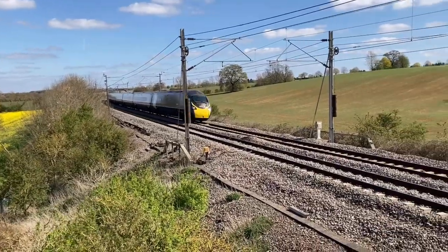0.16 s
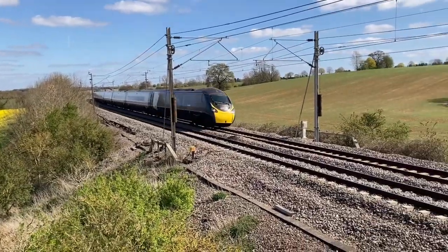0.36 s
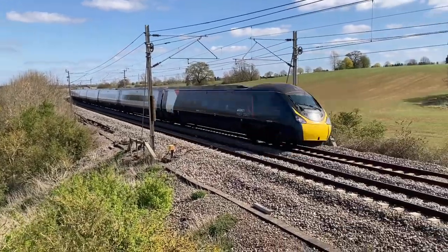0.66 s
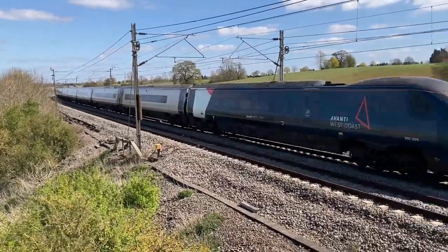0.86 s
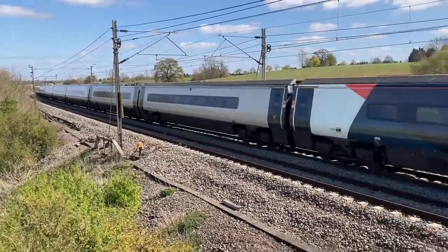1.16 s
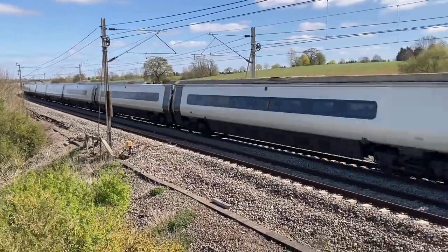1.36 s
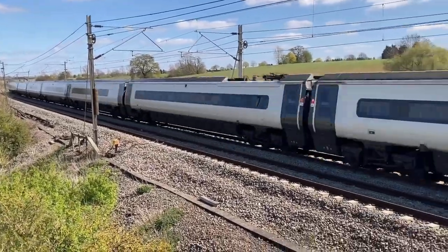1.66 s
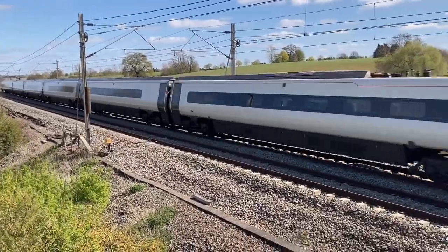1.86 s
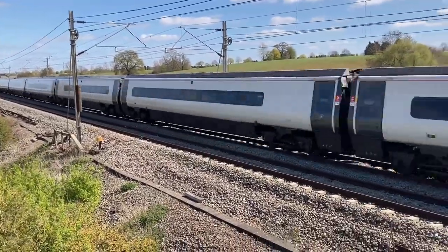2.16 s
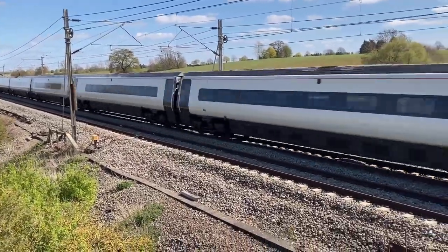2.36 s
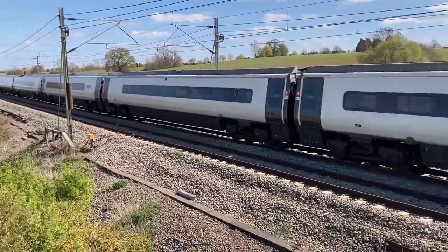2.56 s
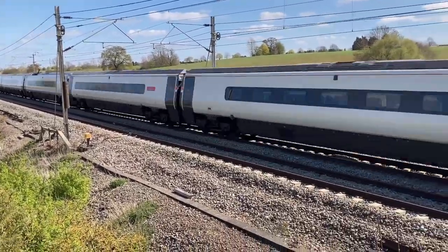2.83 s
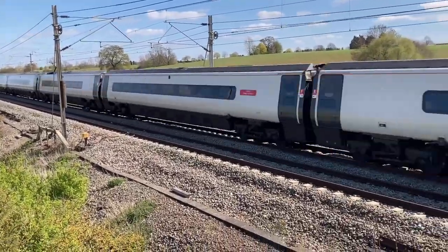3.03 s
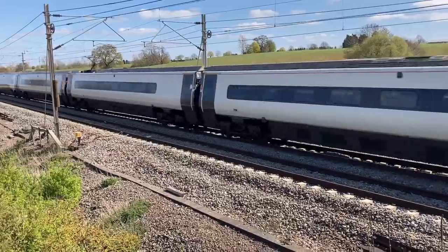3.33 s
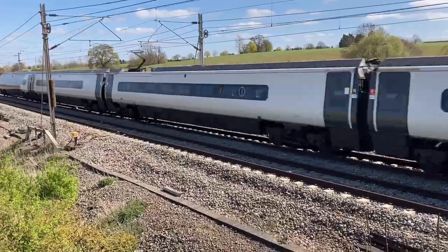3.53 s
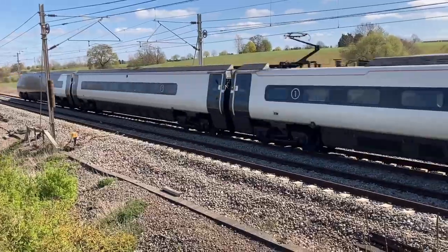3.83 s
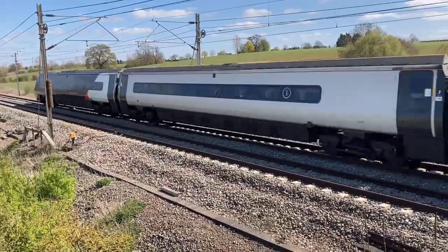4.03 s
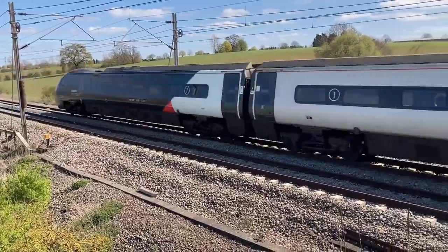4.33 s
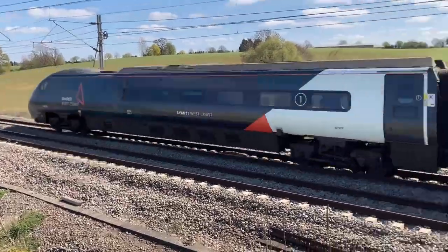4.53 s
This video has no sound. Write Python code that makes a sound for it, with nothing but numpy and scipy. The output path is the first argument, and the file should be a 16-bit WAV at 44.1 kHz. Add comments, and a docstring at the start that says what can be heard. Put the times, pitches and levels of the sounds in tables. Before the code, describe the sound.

In open country, about twenty metres from the track, a stereo microphone is buffeted by wind. From 0 to 0.8 s, deep rumbling gusts and blunt slaps dominate, strongest around 0.25 and 0.55-0.75 s, while thin high rail tones sing and a rushing noise swells. At about 0.74 s a clear, steady metallic ring near 3.3 kHz flares. The leading car passes around 0.9-1.2 s with a peak of roar and a hoarse hum falling in pitch. Then coaches stream by, roughly two per second: grainy wheel rush, airy hiss, fine fizz and low drone. Short, slightly hoarse squeals near 2.7-3.3 kHz flare and slide downward, notably at 1.2, 1.67, 1.94 and 2.57 s, becoming generally weaker later. Another flurry of buffeting comes at 2.4-2.55 s. The rolling roar firms again from 3.6 s, swells briefly near 4.5 s with another squeal, and continues to the cut at 4.7 s.

```python
"""Passage of a fast electric train

A fast electric train passes twenty metres from a two-port microphone in open country.
Resonances filtered from noise make the rails sing; Doppler-shifted noise and tones make bogie after bogie
rush by, each ringing wheel falling in pitch as it passes. The leading car hums, mostly forward.
Filtered noise with gusts and sudden slaps is the wind and slipstream that buffet the microphone."""
import sys
import numpy as np
from scipy import signal
from scipy.fft import rfft, irfft, next_fast_len
from scipy.io import wavfile
from scipy.ndimage import uniform_filter1d, minimum_filter1d

SR = 44100
rng = np.random.default_rng(int(sys.argv[2]) if len(sys.argv) > 2 else 0)


def waveform_to_disk(signal):
    """Save audio, clipped to [-1, 1], as 16-bit WAV at the path in sys.argv[1]."""
    frames = np.transpose(np.atleast_2d(signal))
    scaled = np.clip(frames, -1, 1) * 32767
    samples = np.round(scaled).astype(np.int16)
    wavfile.write(sys.argv[1], SR, samples)


N = 206768
TIME, FREQS = np.arange(N) / SR, np.fft.rfftfreq(N, 1 / SR)  # (s, Hz)

SPEED, DISTANCE, SOUND_SPEED = 56., 20., 343.  # (m/s, m, m/s)
# A coupling abreast (s), time per coach (s), time from bogie to coupling (s)
JOINT_S, COACH_S, BOGIE_S = 1.36, .452, .07
PORT_GAP = 0.032  # (m)
EQUAL_BELOW_HZ, EDGE_HZ = 220, 16000  # no added level or phase difference below; upper band limit
RAIL_NOTE_HZ = 3300

# Steady stream of air on the microphone. Each row: time in seconds, relative rumble in dB,
# relative buffeting in dB.
BREEZE = [(0, -24, -26), (.5, -20, -23), (.95, -24, -33), (1.4, -25.5, -32), (2.2, -27, -32),
          (2.7, -29, -36.5), (3.6, -30.5, -33.5), (4.3, -27.5, -31), (4.69, -24, -33.5)]
# Gusts on top of the breeze. Each row: strongest moment in seconds, half length in seconds,
# relative rumble in dB, relative buffeting in dB.
GUSTS = [(0.156, 0.018, -13, -24), (0.273, 0.018, -9.5, -22.5), (0.33, 0.02, -15, -19),
         (0.404, 0.01, -14.5, -23), (0.439, 0.015, -14, -27), (0.557, 0.014, -26, -17),
         (0.596, 0.018, -10.5, -22), (0.637, 0.0092, -10.5, -18), (0.675, 0.021, -10, -18.5),
         (0.718, 0.015, -12.5, -20), (.741, 0.011, -15, -30), (0.776, 0.04, -19, -45),
         (0.909, 0.013, -20, -30), (1.045, 0.037, -18, -26.5), (1.137, 0.018, -24.5, -19),
         (1.19, 0.022, -19, -31), (2.388, 0.014, -27, -25), (2.429, 0.0083, -12, -20),
         (2.456, 0.011, -14.5, -19.5), (2.541, 0.011, -21.5, -34)]
# Sudden slaps of air. Each row: start in seconds, starting level in dB, decay time in seconds.
SLAPS = [(0.256, -11.5, 0.013), (.567, -12.5, 0.012), (0.638, -8, 0.017), (2.408, -20.5, 0.018),
         (2.443, -20, 0.013), (2.481, -16, 0.014), (2.523, -16, 0.008)]
# Spectra of the deep rumble, the flutter and its brighter part in strong gusts.
# Each row: frequency in Hz, relative spectral level in dB.
RUMBLE_SPECTRUM = [(15, -38), (30, -27), (48, -3), (62, 0), (95, -2), (130, -5), (190, -8), (300, -15),
                   (600, -61)]
BUFFET_SPECTRUM = [(90, -33), (180, -2.5), (250, -0.5), (350, -2.5), (520, -11), (700, -16.5),
                   (1100, -15.5), (3000, -40)]
GUST_SPECTRUM = [(200, -32), (350, 1.5), (600, 0.5), (740, -13.5), (1100, -50), (3000, -46), (6000, -66)]

# Rail resonances under the wheels. Each row: frequency in Hz, width in Hz, relative level in dB.
LOADED_RAIL_MODES = [(670, 19, -39), (750, 12.7, -35), (1374, 12, -46.5), (1488, 11, -45),
                     (1644, 11, -47.5), (1914, 16, -45), (2784, 17, -40.5), (3287, 41, -38.5),
                     (6330, 22, -53)]
# High rail modes that run ahead of the train. Each row: frequency in Hz, width in Hz, relative level in dB.
SINGING_MODES = [(3340, 29, -55), (4250, 50, -40.5), (6630, 16, -41.5), (7300, 37, -40.5), (11000, 35, -43),
                 (11740, 19, -41)]
# Swell of the high rail modes. Each row: time in seconds, gain in dB.
SINGING_SWELL = [(0, -12), (.14, -9), (.4, -12), (.68, -2.5), (.9, -7), (1.25, -22), (1.8, -42)]
# Flares of a rail tone at steady pitch. Each row: loudest moment in seconds, pitch in Hz, level in dB,
# half length in seconds.
RAIL_FLARES = [(0.426, 4180, -35.5, 0.029), (0.535, 4170, -28, 0.02), (0.62, RAIL_NOTE_HZ, -34.5, 0.13),
               (0.739, RAIL_NOTE_HZ, -17, 0.0342), (2.893, RAIL_NOTE_HZ, -30.5, 0.023)]

# Hum of the leading car. Each row: time abreast in seconds, emitted pitch in Hz, relative level in dB,
# extra level thrown ahead in dB.
NOSE_HUM = [(.96, 1480, -36, 5), (1.02, 1009, -34, 1), (1.3, 609, -44.5, 5)]
# Spread of the hum along the track. Each row: metres past the microphone, gain in dB.
NOSE_BEAM = [(-29, -9.5), (-17, 4.5), (4, -8.5), (6, -25)]
# Two low tones and one hissing tone of each bogie. Each row: nominal pitch in Hz, relative level in dB.
DRONE_TONES = [(690, -40), (790, -39), (11000, -51.5)]

# Tones that every wheel rings with. Each entry: emitted pitch in Hz.
WHEEL_MODES = np.array([2870, 3605, 7200])
# Flares of a wheel into a squeal. Each row: loudest moment in seconds, approximate heard pitch in Hz,
# relative level in dB, half length in seconds.
SQUEALS = [(.9, 3220, -17, 0.05), (1.05, 2980, -18.5, 0.053), (1.057, 3700, -25, 0.047),
           (1.15, 3290, -18.5, 0.064), (1.185, 2744, -13.5, 0.038), (1.255, 2726, -17, 0.023),
           (1.382, 3020, -19, 0.037), (1.47, 2795, -21.5, 0.033), (1.535, 2787, -21, 0.037),
           (1.6, 2900, -22.5, 0.044), (1.668, 2746, -14.5, 0.032), (1.818, 3000, -21, 0.03),
           (1.94, 2760, -17.5, 0.035), (2.1, 2750, -25.5, 0.045), (2.255, 3730, -27, 0.021),
           (2.402, 2735, -17.5, 0.024), (2.571, 2740, -15, 0.023), (2.72, 3200, -18, 0.019),
           (2.97, 6950, -33.5, 0.045), (2.99, 2764, -22.5, 0.028), (3.292, 2800, -22, 0.025),
           (3.43, 2720, -26, 0.042), (3.69, 2795, -23.5, 0.026), (3.78, 2800, -30.5, 0.051),
           (3.9, 2730, -21, 0.029), (4.13, 2790, -30, .03), (4.31, 2790, -25, 0.018),
           (4.49, 3180, -20.5, 0.033), (4.62, 2780, -29, 0.031)]
# A strong squeal locks into a clean tone, a weak one stays hoarse. Each row: relative squeal level in dB,
# fuzz as a ratio.
HOARSENESS = [(-24, .65), (-16, .25)]

# Rolling noise as the train goes by. Each row: time in seconds, relative roar in dB, relative rasp in dB.
ROLLING = [(0.0, -45, -53), (0.14, -39, -45.5), (0.21, -43.5, -48.5), (0.43, -37.5, -37.5),
           (0.74, -29, -35), (0.77, -31, -35), (0.9, -24.5, -33), (0.93, -28, -38), (1.1, -27, -32),
           (1.25, -30.5, -42.5), (1.83, -35, -45.5), (3.63, -31, -44.5), (3.8, -32, -43), (4.06, -31, -41),
           (4.4, -35, -50.5), (4.48, -28, -38), (4.69, -29, -46)]
# Air hissing along the coaches. Each row: time in seconds, relative level in dB.
HISSING = [(0.0, -47), (0.47, -40.5), (0.65, -33.5), (0.8, -39), (0.85, -32), (1.12, -35), (1.25, -40),
           (1.3, -35.5), (1.94, -38.5), (2.72, -36.5), (2.97, -36), (3.06, -36.5), (4.1, -35.5),
           (4.26, -42), (4.69, -35.5)]
# Fizz at the top of the treble. Each row: time in seconds, relative level in dB.
FIZZING = [(0, -45), (.45, -48.5), (.67, -41), (1.1, -44), (1.27, -48.5), (1.52, -40), (1.75, -46),
           (2.18, -45.5), (2.35, -39.5), (2.62, -45), (2.85, -43.5), (4.08, -42), (4.69, -42)]
# The air torn up by nose and tail covers the wheels' modes.
# Each row: time in seconds, share of modes from 0 to 1.
MODE_SHARE = [(.5, 0), (1.15, .6), (1.4, 1), (4.3, 1), (4.5, .5)]
# Spectra of the rolling layers. Each row: frequency in Hz, relative spectral level in dB.
ROAR_SPECTRUM = [(250, -28), (550, -1.5), (900, 3.5), (1200, -2), (1700, -2.5), (2050, 1.5), (2250, 4),
                 (2500, 5.5), (3100, 6), (3600, -11.5), (5000, -50)]
RASP_SPECTRUM = [(1800, 4.5), (2700, -32), (3300, 6.5), (3700, 12.5), (4100, 13), (4600, 3.5), (5400, -7),
                 (7000, -58)]
HISS_SPECTRUM = [(4000, -2), (5500, 2), (6300, 4), (7200, 5), (8200, 5.5), (9300, -7.5), (10200, -25)]
FIZZ_SPECTRUM = [(8800, -42), (9800, 10.5), (12500, -3), (13800, -5), (15500, -27)]

# Level added to the left port relative to the right. Each row: frequency in Hz, difference in dB.
BALANCE = [(450, 1), (740, 3.5), (1220, 5.5), (2010, 5.5), (3200, 6.5), (4200, 0), (5500, 0)]
# Phase by which the right port is turned back. Each row: frequency in Hz, phase in radians.
PORT_PHASE = [(700, -1), (1600, -1.5), (2300, -.6), (2750, .4), (3150, 2.4), (3450, .1), (4200, -.6),
              (6200, -5.3), (7400, -6.5), (8500, -9.4), (9500, -9.5), (11800, -12.7), (13100, -15.7)]


def amp(db):
    """Amplitude ratio of a level in decibels."""
    return 10 ** (np.asarray(db) / 20)


def unit(x):
    """Normalization to a root mean square of one."""
    return x / np.sqrt(np.mean(x ** 2) + 1e-20)


def curve(rows, at, axis=1):
    """Linear interpolation of one column of a table."""
    rows = np.array(rows)
    return np.interp(at, rows[:, 0], rows[:, axis])


def spectrum(points):
    """Gain at every frequency, interpolated in dB over log frequency."""
    hz, db = np.transpose(points)
    return amp(np.interp(np.log(FREQS + 1), np.log(hz), db))


def coloured(x, gain):
    """Linear filtering: the spectrum is multiplied by a gain, then scaled to an rms of one."""
    size = next_fast_len(N)
    gain = np.interp(np.fft.rfftfreq(size, 1 / SR), FREQS, gain)
    return unit(irfft(rfft(x, size) * gain, size)[..., :N])


def drift(rate_hz, size=N):
    """Slow random modulation: chance values, rate_hz of them a second, joined by straight lines."""
    steps = np.arange(size) / SR * rate_hz
    return unit(np.interp(steps, np.arange(4000), rng.standard_normal(4000)))


def ports(likeness):
    """Partial coherence: white noise at two ports, correlated by likeness."""
    shared, apart = rng.standard_normal((2, N))
    c = np.clip(likeness, -1, 1)
    return np.sqrt((1 + c) / 2) * shared + np.sqrt((1 - c) / 2) * np.array([apart, -apart])


def steadied(x, size):
    """Partial compression: evens out chance swells of a noise that are longer than size samples."""
    power = uniform_filter1d((x ** 2).mean(axis=0), size)
    return unit(x / (power + 1e-3) ** .35)


def swell(t, half_s):
    """Gaussian envelope: a smooth rise and fall around t = 0."""
    return np.exp(-np.minimum((t / half_s) ** 2, 60) / 2)


def flyby(abreast_s):
    """Retarded time of a moving point: heard samples, place, source time at each port, spreading loss."""
    own = np.linspace(-1.3, .8, 300)  # source time from the moment abreast (s)
    place = SPEED * own
    reach = np.hypot(place, DISTANCE)
    # the shrinking, then growing delay is the Doppler shift
    arrival = abreast_s + own + (reach - DISTANCE) / SOUND_SPEED
    lag = PORT_GAP / SOUND_SPEED * place / reach  # delay between the ports, changing sign when abreast
    span = slice(*np.searchsorted(TIME, arrival[[0, -1]]))
    heard = np.array([np.interp(TIME[span], arrival + side * lag / 2, own) for side in (1, -1)])
    faded_loss = signal.windows.tukey(len(own), .3) * DISTANCE / reach
    loss = np.interp(TIME[span], arrival, faded_loss)
    return span, SPEED * heard[0], heard, loss


def bogie_times():
    """Periodic geometry: moments abreast of the bogies, one on each side of every coupling."""
    joints = JOINT_S + COACH_S * np.arange(-1, 9)
    return np.concatenate([joints - BOGIE_S, joints + BOGIE_S])


def shaken_tone(hz, heard, fuzz, fuzz_hz=190.9, waver_db=1.87, waver_hz=28.7, scatter=0.12):
    """Random modulation broadens a tone: the rail's roughness shakes it and the ballast scatters it."""
    size = heard.shape[1]
    ring = 1 + fuzz * (drift(fuzz_hz, size) + 1j * drift(fuzz_hz, size))
    ballast = scatter * np.array([drift(fuzz_hz, size) + 1j * drift(fuzz_hz, size) for port in heard])
    carrier = np.exp(2j * np.pi * hz * heard)
    return amp(waver_db * drift(waver_hz, size)) * ((ring + ballast) * carrier).real


def air_force():
    """Addition of incoherent powers: strengths of rumble and buffeting from breeze and gusts."""
    power = amp([curve(BREEZE, TIME, axis=1), curve(BREEZE, TIME, axis=2)]) ** 2
    for s, half_s, *levels_db in GUSTS:
        power = power + np.outer(amp(levels_db), swell(TIME - s, half_s)) ** 2
    return np.sqrt(power)


def wind(rumble_db=-1.5, buffet_db=-1.5, lump_db=1.84, lump_hz=24.8, eddy_db=3.5, eddy_hz=111.5,
         strong_db=-13.5, sharpening=0.54):
    """Turbulent pressure: a rumble nearly alike at both ports and a lumpy flutter, brighter in strong gusts."""
    push, force = air_force()
    eddies = amp(eddy_db * drift(eddy_hz))
    rumble = steadied(coloured(ports(likeness=0.987), spectrum(RUMBLE_SPECTRUM)), size=1500)
    rumble = rumble * amp(lump_db * drift(lump_hz))
    buffet = steadied(coloured(ports(likeness=0.89) * eddies, spectrum(BUFFET_SPECTRUM)), size=1300)
    gust = steadied(coloured(ports(likeness=0.58) * eddies, spectrum(GUST_SPECTRUM)), size=1300)
    gust = gust * (force / amp(strong_db)) ** sharpening
    return rumble * amp(rumble_db) * push + (buffet + gust) * amp(buffet_db) * force


def slaps():
    """Impulsive turbulence: single eddies hit the microphone at once and decay exponentially."""
    strength = sum(amp(db) * (TIME > s) * np.exp(-abs(TIME - s) / decay) for s, db, decay in SLAPS)
    colour = spectrum(BUFFET_SPECTRUM) + spectrum(GUST_SPECTRUM)
    return steadied(coloured(ports(likeness=0.88), colour), size=300) * strength


def ringing(modes, likeness):
    """Resonance: noise held in narrow bands, each at its own level."""
    power = sum(amp(db) ** 2 / width / (1 + ((FREQS - hz) / width) ** 2) ** 2 for hz, width, db in modes)
    total = np.linalg.norm(amp(np.array(modes)[:, 2]))
    return coloured(ports(likeness), np.sqrt(power)) * total


def rails(onset_s=0.66, rise_db_per_s=35.0):
    """Resonance of a source at rest: the rails stay put, so their tones keep their pitch."""
    loaded = amp(rise_db_per_s * np.minimum(TIME - onset_s, 0))  # full from onset_s onward
    singing = ringing(SINGING_MODES, likeness=0.82) * amp(curve(SINGING_SWELL, TIME))
    return ringing(LOADED_RAIL_MODES, likeness=0.022) * loaded + singing


def rail_flares(fuzz=0.49):
    """No Doppler shift at rest: rail tones swell briefly without gliding, most strongly just ahead of the nose."""
    out = np.zeros((2, N))
    for s, hz, level_db, half_s in RAIL_FLARES:
        flare = swell(TIME - s, half_s)
        audible = np.flatnonzero(flare > .003)
        tone = shaken_tone(hz, np.array([TIME[audible]] * 2), fuzz)
        out[:, audible] += amp(level_db) * flare[audible] * tone
    return out


def nose_hum(fuzz=0.76, ahead_m=3.5):
    """Directivity of a moving source: hoarse tones of the leading car are thrown mostly ahead of it."""
    out = np.zeros((2, N))
    for s, hz, db, ahead_db in NOSE_HUM:
        span, place, heard, loss = flyby(s)
        # the extra level is full until ahead_m before the microphone
        level = db + curve(NOSE_BEAM, place) + ahead_db * np.clip(-place / ahead_m, 0, 1)
        out[:, span] += amp(level) * loss * shaken_tone(hz, heard, fuzz)
    return out


def bogie_drone(width_hz=170., focus=4.7, spread=0.04, waver_db=4.0, waver_hz=21.95):
    """Narrow-band noise in motion: each bogie's hoarse drone, at a pitch a little its own, swells and sinks."""
    out = np.zeros((2, N))
    for s in bogie_times():
        span, place, heard, loss = flyby(s)
        for hz, db in DRONE_TONES:
            hoarse = drift(width_hz, len(loss)) + 1j * drift(width_hz, len(loss))
            pitch = hz * (1 + spread * rng.uniform(-0.997, 1))
            level = amp(db + waver_db * drift(waver_hz, len(loss))) * loss ** focus
            out[:, span] += level * (hoarse * np.exp(2j * np.pi * pitch * heard)).real
    return out


def faint_squeals(db=-33.5, half_s=0.017, pitch_hz=2790., spread=.03, count=30):
    """Superposition of chance chirps of the lowest wheel mode into a flickering thread; rows like SQUEALS."""
    when, shift = rng.random((count, 2)).T
    progress = np.sqrt((np.arange(count) + when) / count)  # denser toward the rear
    times = JOINT_S + (N / SR - JOINT_S) * progress
    pitches = pitch_hz * (1 + spread * (2 * shift - 1))
    return [(s, hz, db, half_s) for s, hz in zip(times, pitches)]


def wheel_squeals(db=-2., linger_db=-19., linger_s=.09):
    """Doppler shift places each squeal along the track: a wheel's ring flares inside a longer, softer swell."""
    out, mach = np.zeros((2, N)), SPEED / SOUND_SPEED
    for s, heard_hz, level_db, half_s in list(SQUEALS) + faint_squeals():
        mode_hz = WHEEL_MODES[np.argmin(abs(WHEEL_MODES * (1 + mach / 2) - heard_hz))]
        bearing = np.arcsin(np.clip((mode_hz / heard_hz - 1) / mach, -.93, .93))
        # travel time past the microphone plus the extra delay of the longer path
        past_s = DISTANCE * (np.tan(bearing) / SPEED + (1 / np.cos(bearing) - 1) / SOUND_SPEED)
        span, place, heard, loss = flyby(s - past_s)
        flare = swell(TIME[span] - s, half_s) + amp(linger_db) * swell(TIME[span] - s, linger_s)
        audible = np.flatnonzero(flare > .003)
        fuzz = curve(HOARSENESS, level_db)
        tone = shaken_tone(mode_hz, heard[:, audible], fuzz) / np.sqrt(1 + 2 * fuzz ** 2)
        out[:, span.start + audible] += amp(db + level_db) * flare[audible] * tone
    return out


def wheel_rush(ripple_db=10.0, mode_hz=49.9, focus=1.5, diffuse=0.53, fading_db=6.5, fading_hz=14.,
               size=131072):
    """Modal radiation in motion: each bogie's noise has its own thicket of modes, sliding down and fading."""
    out, power = np.zeros((2, N)), np.zeros(N) + 1e-6
    hz = np.fft.rfftfreq(size, 1 / SR)
    mode_number = np.sqrt(hz * 2000) * 2 / mode_hz  # spacing is mode_hz at 2000 Hz and grows with pitch
    for s in bogie_times():
        modes = np.interp(mode_number, np.arange(2000), rng.standard_normal(2000))
        shaped = rfft(rng.standard_normal(size)) * amp(ripple_db * np.minimum(modes, 1))
        noise = unit(irfft(shaped, 2 * size))  # at twice the sample rate, for smooth reading
        span, place, heard, loss = flyby(s)
        share = loss ** focus * amp(fading_db * drift(fading_hz, len(loss)))
        out[:, span] += share * np.interp(heard * 2 * SR + size, np.arange(2 * size), noise)
        power[span] += share ** 2
    clear = curve(MODE_SHARE, TIME)
    covering = np.sqrt(diffuse ** 2 + 1 - clear ** 2) * ports(likeness=0)
    return clear * out / np.sqrt(power) + covering


def rolling(roar_db=2.0, rasp_db=5.5, hiss_db=0.5, fizz_db=3.0, blur=0.32):
    """Broadband radiation of wheels on rail and air along the coaches: roar, rasp, hiss and fine fizz."""
    rush = wheel_rush()
    blurred = rush + blur * ports(likeness=0)  # turbulence blurs the modes of the rasp
    roar = coloured(rush, spectrum(ROAR_SPECTRUM)) * amp(roar_db + curve(ROLLING, TIME, axis=1))
    rasp = coloured(blurred, spectrum(RASP_SPECTRUM)) * amp(rasp_db + curve(ROLLING, TIME, axis=2))
    hiss = coloured(rush, spectrum(HISS_SPECTRUM)) * amp(hiss_db + curve(HISSING, TIME))
    fizz = coloured(rush, spectrum(FIZZ_SPECTRUM)) * amp(fizz_db + curve(FIZZING, TIME))
    return roar + rasp + hiss + fizz


def scene():
    """Superposition of the wind, the track and the train."""
    air = wind() + slaps()
    track = rails() + rail_flares()
    train = nose_hum() + bogie_drone() + wheel_squeals() + rolling()
    return air + track + train


def limiter(x, size=441):
    """Gain control: turns the gain down smoothly around the highest peaks."""
    needed = np.minimum(1, .92 / (abs(x).max(axis=0) + 1e-9))
    return x * uniform_filter1d(minimum_filter1d(needed, size), size)


def record(dry, merge_hz=5800.0):
    """Two-port reception: level and phase differences, one shared treble signal, a limiter and a band limit."""
    left, right = rfft(dry)
    merge = np.pi / 2 / (1 + (merge_hz / (FREQS + 1)) ** 16)  # turns the right port into the left
    right = np.cos(merge) * right + np.sin(merge) * left
    tilt = amp(curve([(EQUAL_BELOW_HZ, 0)] + list(BALANCE), FREQS) / 2)
    turn = np.exp(-1j * curve([(EQUAL_BELOW_HZ, 0)] + list(PORT_PHASE), FREQS))
    heard = limiter(irfft(np.array([left * tilt, right * turn / tilt]), N))
    lowpass = signal.firwin(511, EDGE_HZ, window=("kaiser", 9), fs=SR)
    return signal.oaconvolve(heard, lowpass[None], "same")


dry = scene()
out = record(dry)
waveform_to_disk(out)
```